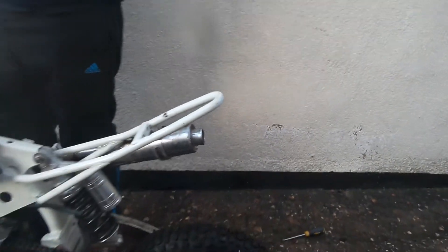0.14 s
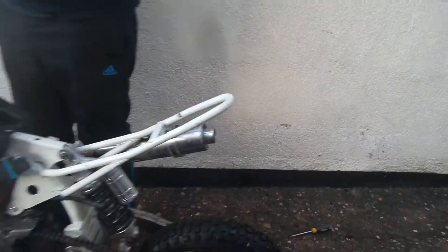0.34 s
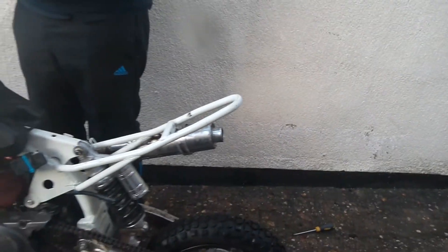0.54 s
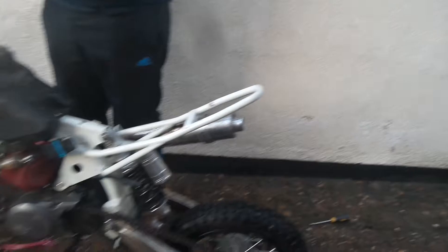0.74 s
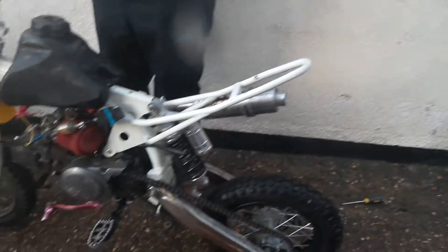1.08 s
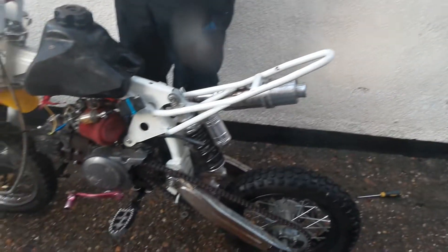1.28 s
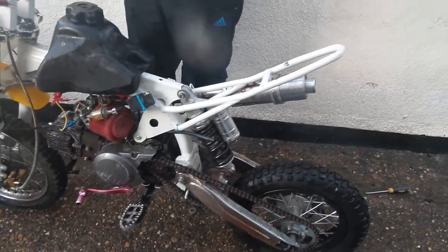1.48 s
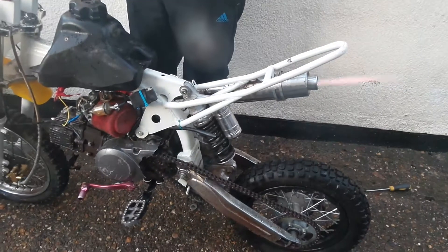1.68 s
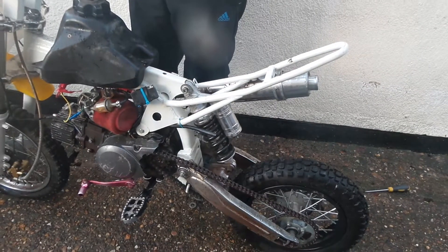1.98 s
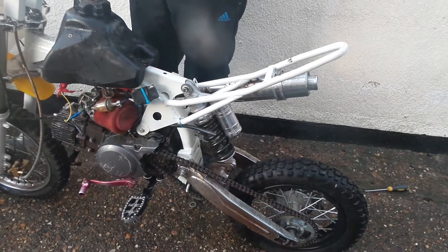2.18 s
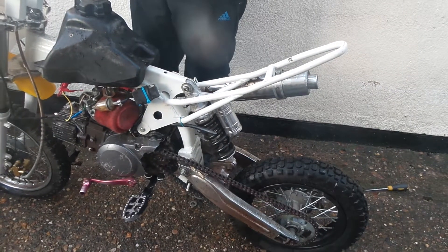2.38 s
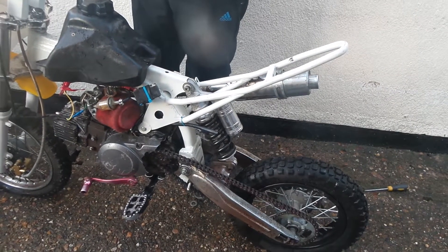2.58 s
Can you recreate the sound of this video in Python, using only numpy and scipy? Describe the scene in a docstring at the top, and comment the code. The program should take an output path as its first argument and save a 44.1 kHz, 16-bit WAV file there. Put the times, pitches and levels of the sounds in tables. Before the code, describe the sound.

A small motorcycle engine idles unevenly, revs once and gives a sharp exhaust pop.

```python
"""Beside a wall, a small single-cylinder four-stroke motorcycle idles lumpily, revs once and runs down.
Every firing thumps the silencer and the intake gulps after it; under throttle the pipe barks and rasps.
On the overrun it sings a falling note and unburnt fuel goes off in one sharp pop; at the end the
throttle is cracked open again. Chain and gears keep up a bright rattle, and the wall adds a short tail."""
import sys
import numpy as np
from scipy import signal
from scipy.fft import rfft, irfft, next_fast_len
from scipy.io import wavfile
from scipy.ndimage import map_coordinates

SR = 44100
rng = np.random.default_rng(int(sys.argv[2]) if len(sys.argv) > 2 else 0)


def to_wav(sig):
    """Store sig (one row per channel, or 1-D mono) as 16-bit WAV at the path in sys.argv[1].

    Samples outside -1..1 are clipped; the rate is SR.
    """
    pcm = np.clip(np.atleast_2d(sig), -1, 1) * 32767
    pcm = np.round(pcm).astype(np.int16)
    wavfile.write(sys.argv[1], SR, pcm.T)  # frames by channels


N = 120393
T = np.arange(N) / SR

# engine speed: t/s, firing rate/Hz
FIRING_RATE = [(0, 33.67), (.15, 32.27), (.78, 26.07), (.87, 32.31), (1, 45.92), (1.1, 56.1), (1.2, 64),
               (1.32, 71.5), (1.42, 67.5), (1.69, 59.4), (2.02, 50), (2.3, 43), (2.63, 37.5), (2.73, 40)]
# silencer thump: t/s, level/dB, scatter between firings/dB (scales a random draw)
THUMP_LEVEL = [(0, -27, -4.5), (.2, -27, 3.5), (.7, -25.5, -10), (.79, -22.5, -2.5), (.95, -22.5, -2.95),
               (1.1, -19, -0.2), (1.27, -20.5, 0.3), (1.38, -36.5, 7.14), (1.69, -22, -4.56),
               (1.76, -20, 2.5), (1.9, -21.5, 0.5), (2.02, -22.5, 1.5), (2.15, -21, 1.15),
               (2.32, -25.5, 1.5), (2.61, -30, -2), (2.66, -26, 4)]


def amp(db):
    """Decibels to gain."""
    return 10 ** (np.asarray(db) / 20)


def unit(x):
    """Scaled to rms 1."""
    return x / np.sqrt(np.mean(x ** 2) + 1e-20)


def along(points, hz):
    """Reads (f/Hz, value) points on a log frequency axis."""
    f, values = np.transpose(points)
    return np.interp(np.log(hz + 1), np.log(f + 1), values)


def curve(rows, at=T, column=1):
    """One column of a time table, joined by straight lines."""
    columns = np.transpose(rows)
    return np.interp(at, columns[0], columns[column])


def wobble(rate):
    """A smooth random curve, rate knots a second."""
    return map_coordinates(rng.standard_normal(int(N * rate / SR) + 4), [T * rate])


def filtered(x, response):
    """x through a complex frequency response."""
    size = 2 * next_fast_len(N // 2 + SR // 4)
    return irfft(rfft(x, size) * response(np.fft.rfftfreq(size, 1 / SR)), size)[..., :N]


def causal(colour, hz):
    """Minimum-phase response with the given spectrum."""
    cepstrum = irfft(np.log(amp(along(colour, hz))))
    cepstrum[1:len(cepstrum) // 2] *= 2
    cepstrum[len(cepstrum) // 2 + 1:] = 0
    return np.exp(rfft(cepstrum))


def hiss(colour, gate=1):
    """Stereo noise of rms 1, gated and then coloured, widest in the treble."""
    # likeness of left and right: f/Hz, correlation
    likeness = [(60, 0.66), (200, 0.92), (500, 0.93), (1000, 0.34), (2500, 0.47), (5000, 0.12),
                (14000, 0.033)]

    def response(hz):
        width = np.arccos(np.clip(along(likeness, hz), -1, 1)) / 2
        return causal(colour, hz) * [np.cos(width), np.sin(width)]
    mid, side = filtered(gate * rng.standard_normal((2, N)), response)
    return unit(np.array([mid + side, mid - side]))


def pulses(times, sizes):
    """Single pulses at the given times."""
    return np.bincount(np.clip(times * SR, 0, N).astype(int), sizes, N + 1)[:N]


def engine_cycles(start=.45):
    """Running count of engine cycles, one firing to each."""
    return start + np.cumsum(curve(FIRING_RATE)) / SR


def firings(slip_s_per_db=.0007):
    """Time and accent (dB) of every firing; uneven burning scatters both."""
    # firings that burn hard or miss: t/s, accent/dB
    lumps = [(.167, 5), (.2, 5.5), (.329, 4.5), (.361, 4), (.395, -3), (.429, 4), (.497, 5), (.566, -4.5),
             (.602, 4), (.638, 1.5), (1.33, 8), (1.94, -42), (1.98, -19), (2.31, -32), (2.46, 3)]
    cycles = engine_cycles()
    times = np.interp(np.arange(1, int(cycles[-1]) + 1), cycles, T)
    scatter_db = curve(THUMP_LEVEL, times, column=2)
    accents = scatter_db * rng.standard_normal(len(times))
    for at, db in lumps:
        accents[np.argmin(abs(times - at))] = db
    slip = slip_s_per_db * scatter_db * rng.standard_normal(len(times))
    return times + slip, accents


def blown(times, accents, levels, body, jitter_s=.00004):
    """Gas pulses through a resonant body, their power following a level curve at any engine speed."""
    def response(hz):
        gain = body(hz)
        return gain / np.sqrt(np.mean(abs(gain) ** 2))
    sizes = amp(curve(levels, times) + accents) / np.sqrt(curve(FIRING_RATE, times) / SR)
    train = pulses(times + jitter_s * rng.standard_normal(len(times)), sizes)
    return filtered(-train, response)


def thump(times, accents, low_hz=83, soft_hz=1560, ring_up=9):
    """Each firing rings the silencer, whose resonances build ring_up times faster than they die."""
    # silencer resonances: f/Hz, width/Hz, level/dB
    modes = [(193.5, 21.5, 13), (202, 29, -8), (419, 47, -7), (515.7, 20.7, 2), (661, 32, -11.5),
             (892, 65, -14), (1158.4, 15.5, -7.5), (2203, 120, -10.5)]

    def silencer(hz):
        def peak(centre, width):
            return 1j * hz * width / (centre ** 2 - hz ** 2 + 1j * hz * width)
        ring = sum(amp(db) * peak(f, width) * peak(f, ring_up * width) for f, width, db in modes)
        low_cut = (1j * hz / (low_hz + 1j * hz)) ** 2
        return ring * low_cut / (1 + 1j * hz / soft_hz)
    return blown(times, accents, THUMP_LEVEL, silencer)


def bark(times, accents):
    """Under load a harder pressure front makes the pipe bark in the midrange."""
    # bark of the loaded engine: t/s, level/dB
    levels = [(0, -43), (.75, -39.5), (.93, -39), (1.01, -27), (1.15, -25), (1.27, -23), (1.4, -31.5),
              (1.52, -52), (1.7, -33), (1.9, -38.5), (2.73, -70)]
    # its spectrum: f/Hz, level/dB
    colour = [(40, -46), (120, -58.5), (260, -3), (380, 4.5), (540, -5.5), (630, -6.5), (740, 6.5),
              (860, -8.5), (1000, -17), (2500, -24), (5000, -38)]
    return blown(times, accents / 2, levels, lambda hz: causal(colour, hz), jitter_s=.00005)


def intake(times, lag_s=.0122, scatter_db=3):
    """The intake draws a soft low gulp after each exhaust stroke."""
    # dull gulps: t/s, level/dB
    levels = [(0, -31.5), (.35, -46), (.7, -36), (.85, -48), (1.1, -31.5), (1.4, -61), (1.7, -63),
              (1.85, -40), (2.25, -40), (2.4, -35.5)]
    # their spectrum: f/Hz, level/dB
    colour = [(25, -50), (50, -7), (75, 7.5), (110, 9), (150, 1), (300, -6), (1000, -53)]
    accents = scatter_db * rng.standard_normal(len(times))
    return blown(times + lag_s, accents, levels, lambda hz: causal(colour, hz))


def yard(x):
    """The wall and ground answer with a short scattered tail, thin in the bass."""
    # decay of the reflections: f/Hz, t60/s
    decay = [(100, 0.6), (600, 0.12), (4000, 0.48), (14000, 0.094)]
    tilt = [(100, -18.5), (200, -21), (500, -2), (1500, 3)]  # f/Hz, level/dB
    hz, t, noise = signal.stft(rng.standard_normal((2, SR // 3)), SR, nperseg=256)
    tail = signal.istft(noise * amp(-60 * t / along(decay, hz)[:, None]), SR, nperseg=256)[1]
    wet = signal.fftconvolve(x[None], tail / np.linalg.norm(tail[0]), axes=1)[:, :N]
    return filtered(wet, lambda f: amp(along(tilt, f)))


def rasp(times, accents, puff_s=.0028, crack_s=.0022, echo_s=.0053, echo_gain=.6, steady_flow=.42):
    """Each firing gives a sharp crack and a longer puff of turbulent gas, both repeated by the pipe."""
    # gas rasping out: t/s, level/dB
    puff_level = [(0, -22.5), (.76, -31), (.9, -22), (1.1, -13.5), (1.28, -10.5), (1.42, -11), (1.65, -51),
                  (1.9, -22.5), (2.66, -32), (2.73, -31)]
    # its spectrum: f/Hz, level/dB
    puff_colour = [(80, -39.5), (300, 2.5), (800, 3), (1400, -4), (2000, -2), (2400, -1.5), (3300, -1),
                   (4500, 12), (5600, 3.5), (7000, -14.5), (10000, -12.5), (13000, -11), (16000, -26)]
    # exhaust valve cracking open under throttle: t/s, level/dB
    crack_level = [(.74, -46), (.825, -21), (.89, -17.5), (1, -15.5), (1.32, -20), (1.45, -45),
                   (1.8, -41.5), (2.68, -44), (2.72, -17)]
    # its spectrum: f/Hz, level/dB
    crack_colour = [(100, -20), (500, -10), (1400, -7.5), (2400, -3.5), (4600, 12.5), (7000, -11),
                    (13000, -12.5), (16000, -4)]
    sizes = amp(accents / 2)
    train = pulses(times, sizes) + echo_gain * pulses(times + echo_s, sizes)

    def fading(decay_s):
        return signal.lfilter([1], [1, -np.exp(-1 / (decay_s * SR))], train)
    puffs = amp(curve(puff_level)) * hiss(puff_colour, fading(puff_s) + steady_flow)
    cracks = amp(curve(crack_level)) * hiss(crack_colour, fading(crack_s))
    return puffs + cracks


def machinery(grain_db=1.0, grain_hz=520, flutter_db=.76, flutter_hz=45.3, case_t60_s=.036, case_db=.5):
    """Chain and gears: dense uneven ticks ring the metal case, with a few thin tones."""
    # rattle of the moving parts: t/s, level/dB
    levels = [(0, -22), (.2, -22), (.35, -24), (.7, -21.5), (.9, -20.5), (1.08, -13), (1.25, -9),
              (1.38, -13), (1.55, -10.5), (1.7, -13.5), (1.9, -15), (2.15, -16), (2.4, -16.5), (2.73, -17)]
    # spectrum of the ticks: f/Hz, level/dB
    colour = [(50, -23), (300, -34.5), (900, -18.5), (1400, -26.5), (1950, -20.5), (2300, -15.5),
              (2900, -14), (3500, -11.5), (4050, 1), (4500, -4.5), (5100, -8.5), (5800, -16.5), (6800, -26),
              (10500, -29.5), (12800, -32.5), (16000, -31)]
    # gear whine: f/Hz, level/dB against the rattle
    gear_tones = [(2279, -22), (4005, -31)]

    def tone(hz, drift_rad=.44):
        stereo_drift = drift_rad * np.array([wobble(31.75), wobble(30.5)])
        return np.sin(2 * np.pi * hz * T + stereo_drift + wobble(12))
    ticks = hiss(colour, amp(grain_db * wobble(grain_hz) + flutter_db * wobble(flutter_hz)))
    case = rng.standard_normal((2, N)) * amp(-60 * T / case_t60_s)
    case_ring = signal.fftconvolve(ticks, case / np.linalg.norm(case[0]), axes=1)[:, :N]
    rattle = unit(ticks + amp(case_db) * case_ring)
    swell = np.exp(-((T - 1.47) / .13) ** 2 / 2)  # one part rings briefly as the engine slows
    coast_ring = amp(-29) * swell * tone(hz=1614)
    whine = sum(amp(db) * tone(hz) for hz, db in gear_tones)
    return amp(curve(levels)) * (rattle + whine) + coast_ring


def pops(crackle_db=3.5, crackle_hz=540):
    """Unburnt fuel goes off in the pipe: a sudden crackling gust that dies away."""
    # a tiny spit at idle, then the big pop: t/s, level/dB, rise/s, t60/s
    bursts = [(0.332, -16, 0.00097, 0.015), (1.7205, 1.5, 0.0051, 0.27)]
    # their spectrum: f/Hz, level/dB
    colour = [(30, -2), (80, 6), (300, 2), (800, -3), (1400, -4.5), (2300, 0), (3500, 6), (4800, 14.5),
              (5800, 6), (7200, -3.5), (10000, -7), (13500, -7), (16000, -21)]
    envelope = 0
    for at, db, rise, t60 in bursts:
        age = np.maximum(T - at, 0)
        envelope += amp(db - 60 * age / t60) * (1 - np.exp(-age / rise))
    return envelope * hiss(colour, amp(crackle_db * wobble(crackle_hz)))


def overrun():
    """With the throttle shut the piston pumps evenly and the pipe sings a clean falling note."""
    # swell of the note: t/s, level/dB
    levels = [(1.15, -36.5), (1.25, -29), (1.33, -36), (1.35, -14.5), (1.5, -17), (1.7, -18), (1.75, -47)]
    # its harmonics: multiple of the firing rate, level/dB
    harmonics = [(2, -15), (3, 0), (4, -15), (6, -22), (7, -20), (8, -19), (9, -21), (10, -17), (11, -19),
                 (12, -16), (14, -23)]
    cycles = engine_cycles()
    note = sum(amp(db) * np.sin(2 * np.pi * (k * cycles + rng.random())) for k, db in harmonics)
    return amp(curve(levels)) * note


def scene():
    """The engine by the wall, each band leaning to the left or right."""
    # stereo lean: f/Hz, left minus right/dB
    balance = [(60, -8.5), (110, 1.5), (200, 0.5), (380, -0.5), (700, -1), (1290, -4.5), (2380, -2.5),
               (4400, -9.5), (8120, 3), (15000, -10.5)]
    times, accents = firings()
    engine = thump(times, accents) + bark(times, accents) + intake(times)
    mix = engine + yard(engine) + overrun() + rasp(times, accents) + machinery() + pops()
    return filtered(mix, lambda hz: amp(along(balance, hz) * np.array([[.5], [-.5]])))


def record(dry):
    """Peaks are rounded off at full scale and the very top of the treble is cut."""
    rounded = dry / (1 + np.abs(dry) ** 6) ** (1 / 6)
    return filtered(rounded, lambda hz: hz < 15750)


dry = scene()
out = record(dry)
to_wav(out)
```